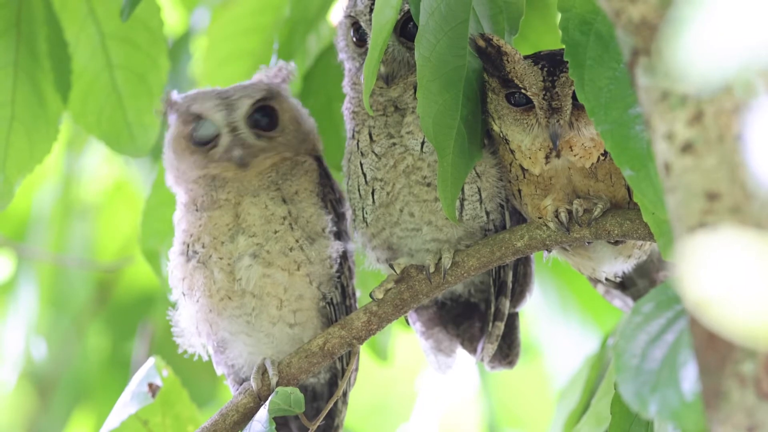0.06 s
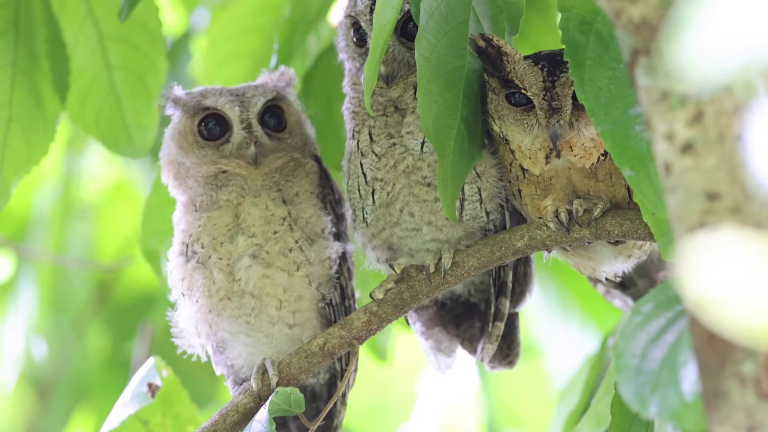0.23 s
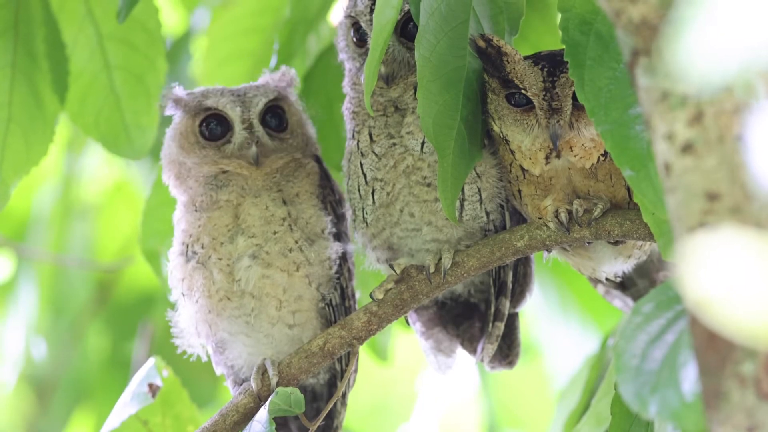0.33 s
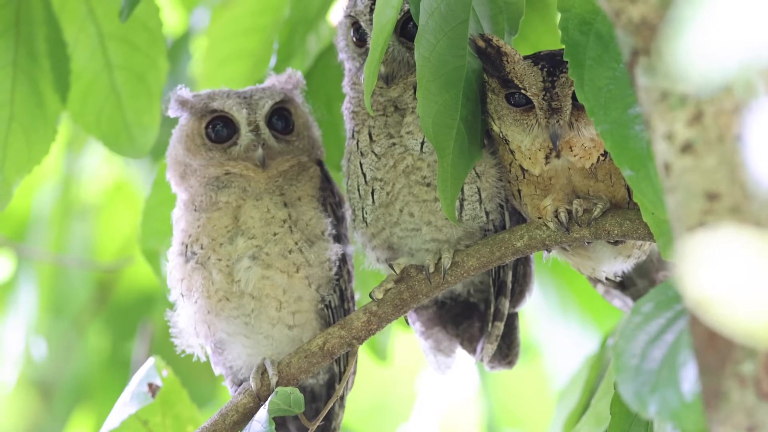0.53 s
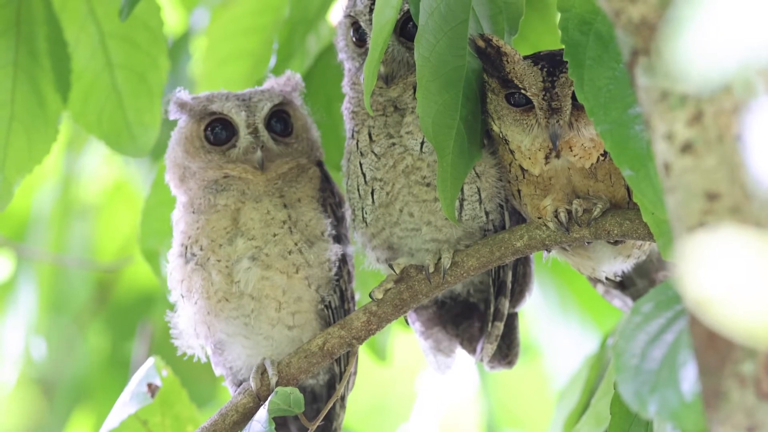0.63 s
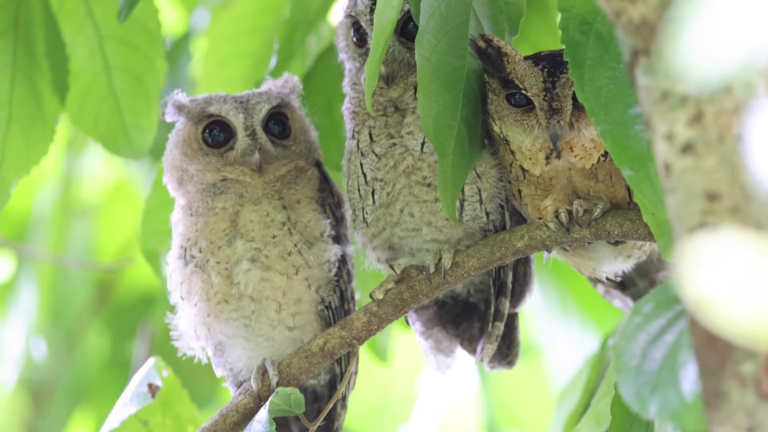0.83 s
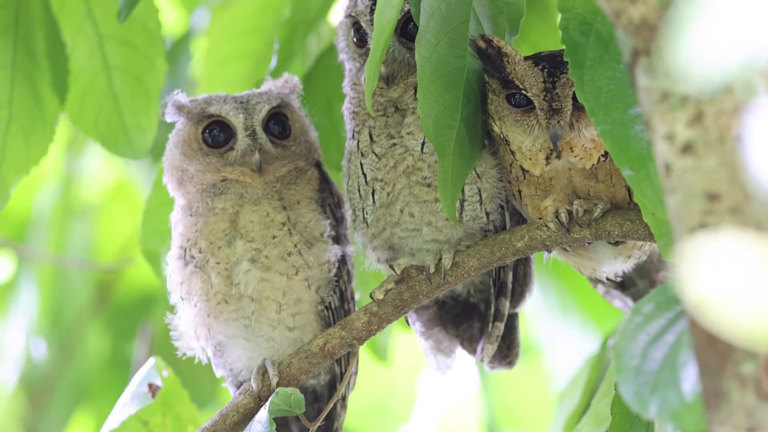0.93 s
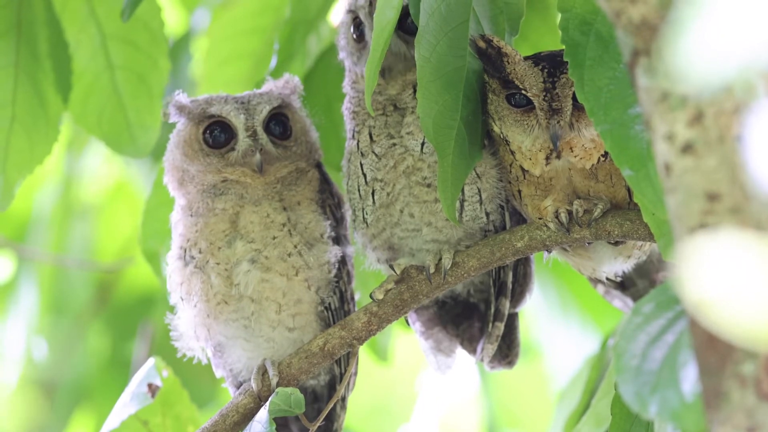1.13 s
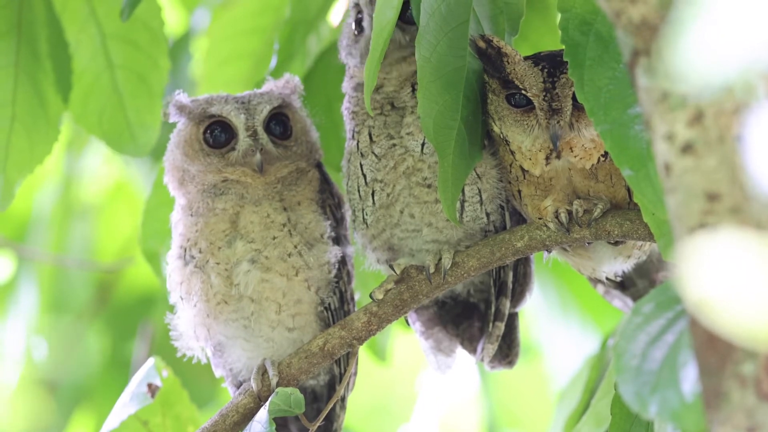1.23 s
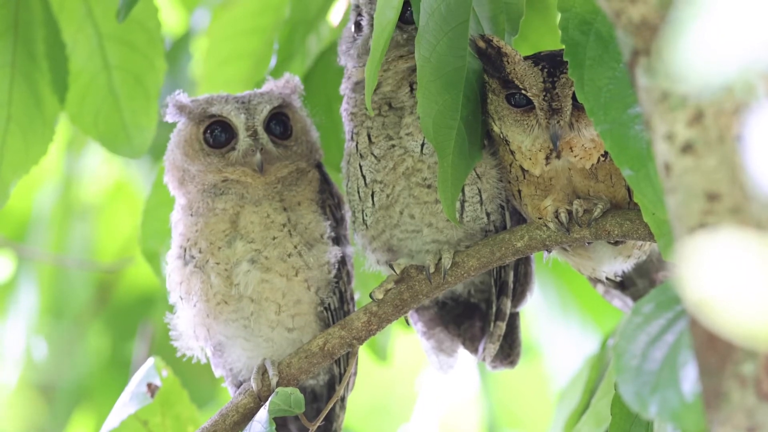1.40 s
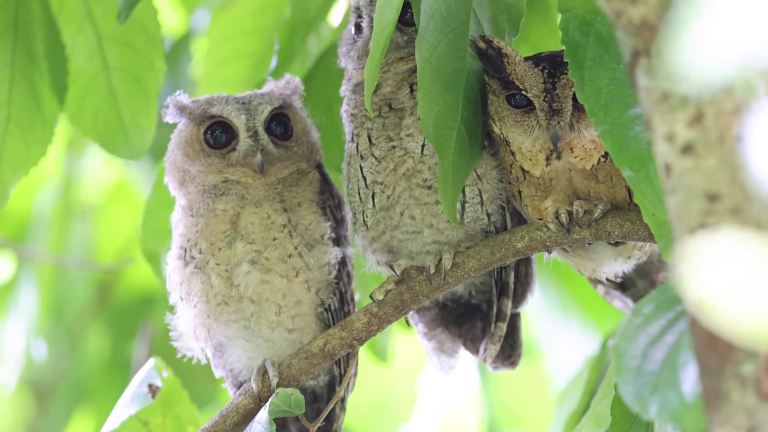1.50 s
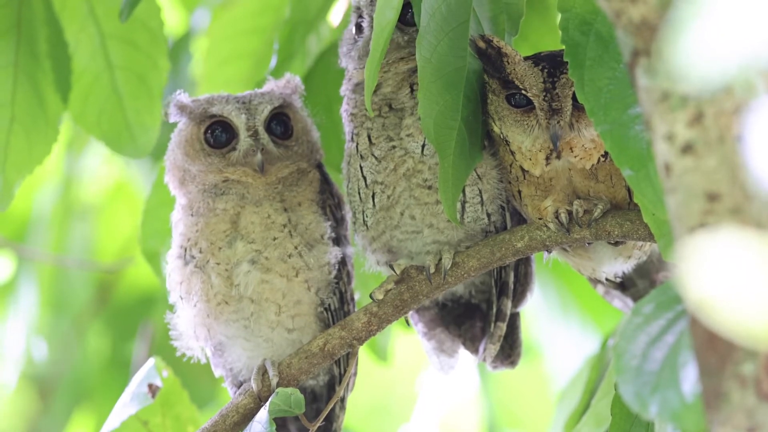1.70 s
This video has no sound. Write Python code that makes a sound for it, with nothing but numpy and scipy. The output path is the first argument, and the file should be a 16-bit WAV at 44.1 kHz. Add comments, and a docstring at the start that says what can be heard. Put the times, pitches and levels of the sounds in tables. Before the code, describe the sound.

A crow calls some way off in a park. An earlier caw's echo fades at the start, with faint chips and leaf ticks. From 0.1 seconds a long husky note swells, running into a louder rasping caw from 0.7 to 0.9 seconds, which echoes briefly among trees. A low wind puff buffets the microphone around 0.4 seconds. Faint rustling and steady distant traffic continue until about 1.7 seconds.

```python
"""A crow calls some way off among park trees, over the dying echo of an earlier caw.
Its long husky note, partials blurred by breath, runs into a loud rasping caw, a pulse train that
rings the throat's resonances; trunks and foliage throw the call back. A puff of turbulent wind
buffets the microphone. Leaves tick and rustle, with a few faint chips and a thin whine,
over the steady wash of the city."""
import sys
import numpy as np
from scipy import signal
from scipy.fft import rfft, irfft
from scipy.io import wavfile
from scipy.ndimage import uniform_filter1d

SR = 44100
rng = np.random.default_rng(int(sys.argv[2]) if len(sys.argv) > 2 else 0)


def unload_audio(sound):
    """Save the sound as a 16-bit wav file, at the path given as the first command line argument."""
    columns = np.transpose(np.atleast_2d(sound))
    # keep every value between -1 and 1, then stretch to whole-number steps
    steps = np.round(np.clip(columns, -1, 1) * 32767)
    wavfile.write(sys.argv[1], SR, steps.astype(np.int16))


N = 77175
T = np.arange(N) / SR


# course of the caw: time_s, level_db, tuning_ratio
CAW = [(.67, -41, 1.2), (.705, -35.5, 1.02), (.738, -22, 1.025), (.78, -23, 0.999), (.805, -21, 0.965),
       (.845, -21, 0.98), (.878, -27, 0.948), (.905, -32, 0.969), (.925, -50, 0.92)]
# throat resonances: centre_hz, width_hz, gain_db
FORMANTS = [(914, 114, -17), (1150, 170, -7), (1390, 160, -9), (1612, 206, 1), (1795, 113, 2),
            (2210, 140, -21.5)]
def caw():
    """Source and filter: slow, rough pulses ring throat resonances that sink in frequency."""
    pulse_hz, break_s, noise_share = 88.44, .81, .32
    jitter = .0342 * (1 + np.tanh((T - break_s) / .0096)) / 2  # the pulses turn uneven at the break
    cycles = np.cumsum(pulse_hz * (1 + jitter * drift(60))) / SR
    main, between = (np.diff(np.floor(cycles + offset), prepend=0) for offset in (0, .45))
    pulses = (main + .48 * between) * amp(2.25 * drift(71))
    puffs = np.exp(-(cycles % 1) / .74) * rng.standard_normal(N)
    drive = (1 - noise_share) * unit(pulses) + noise_share * unit(puffs)
    tuning = curve(CAW, column=2)
    voice = sum(amp(db) * resonate(np.roll(drive, 37 * i), hz * tuning, width)
                for i, (hz, width, db) in enumerate(FORMANTS))
    return steady(voice) * level(CAW)


# course of the husky note: time_s, level_db, pitch_hz
HUSK = [(.12, -47, 392.1), (.17, -38.5, 396.6), (.25, -32.5, 417.3), (.32, -30, 414.8), (.39, -32, 403),
        (.48, -32, 389), (.56, -32, 382), (.66, -36.5, 362.3), (.74, -38.5, 354.4)]
# its partials: harmonic_number, width_hz, gain_db
PARTIALS = [(2, 140, -15.5), (3, 120, -7.5), (4, 220, -4), (5, 167, 1.5), (6, 290, -15)]
# breath spectrum: frequency_hz, density_db
BREATH = [(300, -50), (800, -10), (1100, -42), (1400, -1.5), (1900, 0.5), (2300, -3), (2800, -15),
          (3600, -21), (4300, -16), (5300, -24.5), (6100, -18.5), (7800, -36.5), (15000, -63)]
def husky_note():
    """Amplitude modulation: a rattle shakes breath noise and harmonics that are part tone, part hiss."""
    tone_share, rattle_hz, rattle_depth = .38, 92, .22
    pitch = curve(HUSK, column=2)
    cycles = np.cumsum(pitch * (1 + .015 * drift(65))) / SR
    tone = unit(sum(amp(db) * np.cos(2 * np.pi * k * cycles) for k, _, db in PARTIALS))
    hiss = unit(sum(amp(db) * steady(resonate(rng.standard_normal(N), k * pitch, width))
                    for k, width, db in PARTIALS))
    voice = unit(tone_share * tone + (1 - tone_share) * hiss)
    rattle_cycles = np.cumsum(rattle_hz * (1 + .042 * drift(32.5))) / SR
    rattle = 1 + rattle_depth * np.cos(2 * np.pi * rattle_cycles)
    return steady((voice + amp(-3.5) * noise(BREATH)) * rattle) * level(HUSK)


# course of the opening throat: time_s, level_db, frequency_hz
OPENING = [(.3, -59, 1300), (.38, -42, 1240), (.5, -37, 1324), (.62, -35, 1334), (.7, -38, 1270),
           (.78, -36.5, 1207)]
# its resonances: frequency_ratio, gain_db
LOW_RESONANCES = [(0.98, -0.5), (0.704, -6.5), (0.378, -9.5)]
def throat_opening():
    """Resonance: breath excites low throat modes that open as the husky note goes on."""
    hz, breath = curve(OPENING, column=2), rng.standard_normal(N)
    modes = sum(amp(db) * resonate(breath, hz * ratio, width_hz=137) for ratio, db in LOW_RESONANCES)
    return steady(modes) * level(OPENING)


# paths by way of near trunks: delay_s, gain_db
REFLECTIONS = [(.0043, -11), (0.0172, -3), (.031, -11.5), (.115, -14), (.28, -27)]
def near_trunks(direct):
    """Early reflections: delayed copies smear the sound, whose rms is kept."""
    echoes = sum(amp(db) * np.interp(T - delay, T, direct, left=0) for delay, db in REFLECTIONS)
    return unit(direct + echoes) * np.std(direct)


def trees(sound, t60_s=.73, echoes_per_s=2000):
    """Diffuse reverberation: scattering by trunks and foliage leaves an exponential tail."""
    taps = rng.standard_normal(N) * (rng.random(N) < echoes_per_s / SR)
    taps *= amp(-60 * T / t60_s) * np.minimum(T / .004, 1)
    return signal.fftconvolve(sound, taps / np.linalg.norm(taps))[:N]


# course of the earlier caw's echo: time_s, level_db
ECHO = [(0, -35), (.02, -34.5), (.06, -40.5), (.12, -47), (.2, -37.5)]
# its spectrum: frequency_hz, density_db
ECHO_COLOUR = [(700, -44), (1100, -8.5), (1300, 2), (1440, -6), (1650, 6), (1820, -1), (2000, -13),
               (3000, -60)]
def earlier_echo():
    """Scattering has blurred an earlier caw into noise with the colour of the throat."""
    return steady(noise(ECHO_COLOUR)) * level(ECHO)


# course of the puff: time_s, level_db
BUFFET = [(.3, -59), (.34, -31), (.358, -32), (.366, -17.5), (.42, -17.5), (.445, -21.5), (.475, -30.5),
          (.51, -36), (.56, -42), (.66, -53.5)]
# eddy spectrum: frequency_hz, density_db
EDDY_COLOUR = [(20, -39), (35, -11), (60, 0), (95, -5.5), (135, -4.5), (200, -1), (260, -10), (340, -16.5),
               (500, -27.5), (900, -38), (3000, -82)]
# soft thuds late in the puff: time_s, level_db, pitch_hz
THUDS = [(.426, -16.5, 141), (.445, -14.5, 166), (.463, -9.5, 137)]
def wind_buffet():
    """Turbulence at the microphone port: low, lumpy pressure swings end in a few thuds."""
    eddies = steady(noise(EDDY_COLOUR), size=900)
    puff = unit(np.tanh(eddies / 2.3)) * level(BUFFET)  # tanh rounds off the peaks
    thuds = sum(amp(db) * np.cos(2 * np.pi * hz * (T - s)) * bell(s, sigma_s=.0043)
                for s, db, hz in THUDS)
    return puff + thuds


# dry leaf ticks: start_s, level_db, centre_hz
TICKS = [(.047, -54, 12500), (.055, -56, 14000), (.055, -53, 9600), (.082, -44.5, 7400), (.157, -53, 9400),
         (.215, -52, 13400)]
def leaf_ticks(decay_s=.0026):
    """Damped transients: each tick is a band of noise that decays exponentially."""
    out = np.zeros(N)
    for start, db, hz in TICKS:
        age = np.maximum(T - start, 0)
        band = [(hz / 2 ** 1.04, -36), (hz, 0), (hz * 2 ** 1.04, -36)]
        out += amp(db) * noise(band) * (T >= start) * np.exp(-age / decay_s)
    return out


# leaf brushes: time_s, sigma_s, level_db
RUSTLES = [(0.081, 0.0052, -53), (0.156, 0.0098, -47), (.43, 0.011, -39), (0.473, .028, -44),
           (0.851, 0.024, -47), (0.972, .012, -54), (1.131, 0.0093, -51.5)]
# course of the stirring leaves: time_s, level_db
LEAF_HISS = [(0, -76), (.15, -56), (.5, -48), (.75, -56.5), (1.3, -56.5), (1.55, -59.5), (1.75, -56)]
# spectrum of both: frequency_hz, density_db
LEAF_COLOUR = [(1200, -5.5), (3000, 4), (4500, 0), (6500, -6), (8500, -14), (14000, -19), (16000, -30)]
# course of the top treble during the puff: time_s, level_db
FIZZ = [(.36, -76), (.42, -66), (.47, -62), (.495, -58), (.52, -70), (.58, -76)]
# its spectrum: frequency_hz, density_db
FIZZ_COLOUR = [(4000, -30), (9000, 5), (16000, -4)]
def leaf_rustle():
    """Friction noise: leaves brush in short, grainy bursts over a faint hiss."""
    out = noise(LEAF_COLOUR) * level(LEAF_HISS) + noise(FIZZ_COLOUR) * level(FIZZ)
    for s, sigma_s, db in RUSTLES:
        grain = unit(noise(LEAF_COLOUR) * amp(2 * drift(500)))
        out += amp(db) * grain * bell(s, sigma_s)
    return out


# faint chips, perhaps a small bird: time_s, level_db, pitch_hz
CHIPS = [(0.084, -43, 3700), (.118, -44, 3560), (.153, -46, 3560)]
def chips():
    """Tone bursts: each chip is a sine under a very short Gaussian envelope."""
    return sum(amp(db) * np.sin(2 * np.pi * hz * T) * bell(s, sigma_s=.0022) for s, db, hz in CHIPS)


# spectrum of far traffic: frequency_hz, density_db
TRAFFIC = [(20, -12), (32, -9), (42, 2.5), (60, -7), (130, -6), (200, -5), (290, -5), (380, -8),
           (560, -7.5), (770, -11.5), (1000, -11), (1600, -12), (2100, -16.5), (3000, -22), (4200, -29.5),
           (6500, -35), (9000, -41), (15500, -50)]
def city():
    """Incoherent summation: far traffic merges into a wash of noise, with a low drone."""
    hz, t, spectrum = signal.stft(steady(noise(TRAFFIC)), SR, nperseg=1024)
    patches = uniform_filter1d(rng.standard_normal(spectrum.shape), size=12, axis=0)
    patches_db = 1.07 * unit(uniform_filter1d(patches, size=7, axis=1))
    dulling_db = 4 * np.outer(hz / (hz + 450), np.maximum(t - 1, 0))  # the treble fades after 1 s
    wash = unit(signal.istft(spectrum * amp(patches_db - dulling_db), nperseg=1024)[1][:N])
    drone = steady(resonate(rng.standard_normal(N), hz=200, width_hz=21))
    return amp(-39) * wash + amp(-51) * drone


def whine(end_s=1.36):
    """Narrow-band noise, heard as a thin high whine that stops."""
    band = resonate(rng.standard_normal(N), hz=12000, width_hz=450)
    return amp(-78) * band * np.clip((end_s - T) / .03, 0, 1)


def amp(db):
    """Decibels to amplitude gain."""
    return 10 ** (np.asarray(db) / 20)


def unit(x):
    """Normalisation to rms 1."""
    return x / np.sqrt(np.mean(x ** 2) + 1e-20)


def curve(rows, column=1):
    """Linear interpolation of one table column through time."""
    rows = np.array(rows)
    return np.interp(T, rows[:, 0], rows[:, column])


def level(rows):
    """Amplitude envelope from a dB curve, fading quickly outside it."""
    outside_s = np.maximum(rows[0][0] - T, 0) + np.maximum(T - rows[-1][0], 0)
    return amp(curve(rows)) * np.exp(-(outside_s / .01) ** 2)


def bell(centre_s, sigma_s):
    """Gaussian envelope of peak 1."""
    return np.exp(-((T - centre_s) / sigma_s) ** 2 / 2)


def noise(colour):
    """Spectral shaping of white noise; rms 1."""
    hz, db = np.transpose(colour)
    shape = amp(np.interp(np.log(np.fft.rfftfreq(N, 1 / SR) + 1), np.log(hz + 1), db))
    return unit(irfft(rfft(rng.standard_normal(N)) * shape, N))


def drift(hz):
    """Low-pass noise: a random wander of rms 1."""
    low_pass = np.exp(-(np.fft.rfftfreq(N, 1 / SR) / hz) ** 2)
    return unit(irfft(rfft(rng.standard_normal(N)) * low_pass, N))


def steady(x, size=1800):
    """Division by the running rms evens out slow swells and keeps the fast grain."""
    power = uniform_filter1d(uniform_filter1d(x ** 2, size), size)
    return x / np.sqrt(abs(power) + 1e-20)


def resonate(x, hz, width_hz):
    """A double-pole resonance whose centre follows hz; rms 1."""
    carrier = np.exp(2j * np.pi * np.cumsum(hz * np.ones(N)) / SR)
    pole = np.exp(-np.pi * width_hz / SR)
    return unit((carrier * signal.lfilter([1], [1, -2 * pole, pole * pole], x / carrier)).real)


def scene():
    """Superposition of the crow, its echoes, the wind and the background, in mono."""
    husk = husky_note() + throat_opening()
    rasp = near_trunks(caw())
    echoes = trees(amp(-7) * husk + amp(-10) * rasp) + earlier_echo()
    surroundings = wind_buffet() + leaf_rustle() + leaf_ticks() + chips() + city() + whine()
    return (husk + rasp + echoes + surroundings)[None]


def record(dry, low_hz=22, high_hz=15700):
    """Band limiting: a gentle low cut and a steep treble edge."""
    low_cut = signal.butter(2, low_hz, "highpass", fs=SR, output="sos")
    high_cut = signal.firwin(511, high_hz, window=("kaiser", 9), fs=SR)
    return signal.oaconvolve(signal.sosfilt(low_cut, dry), high_cut[None], "same")


dry = scene()
out = record(dry)
unload_audio(out)
```